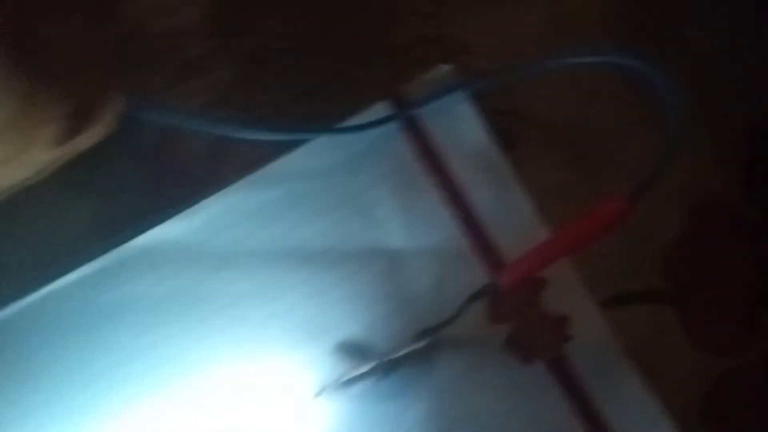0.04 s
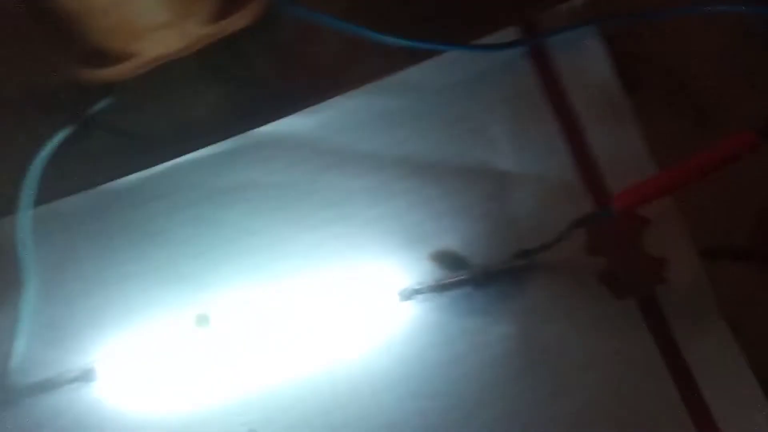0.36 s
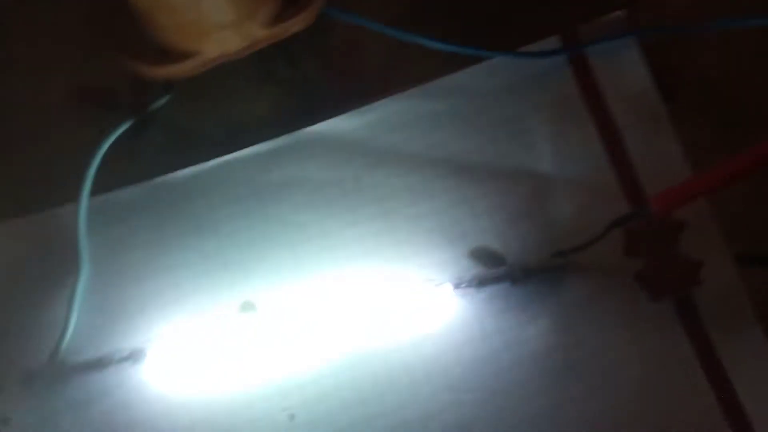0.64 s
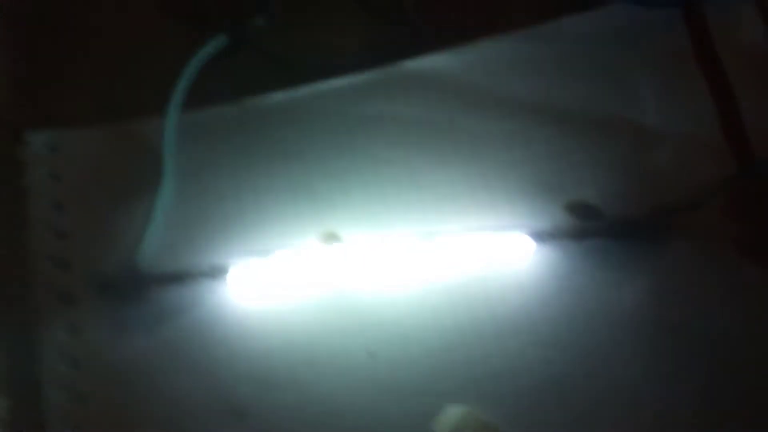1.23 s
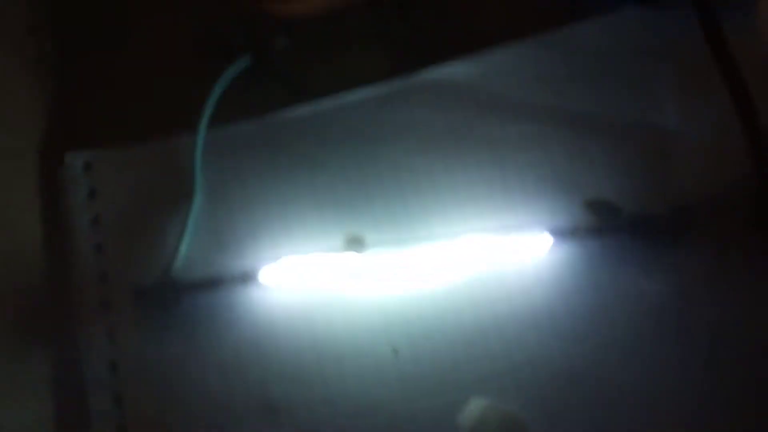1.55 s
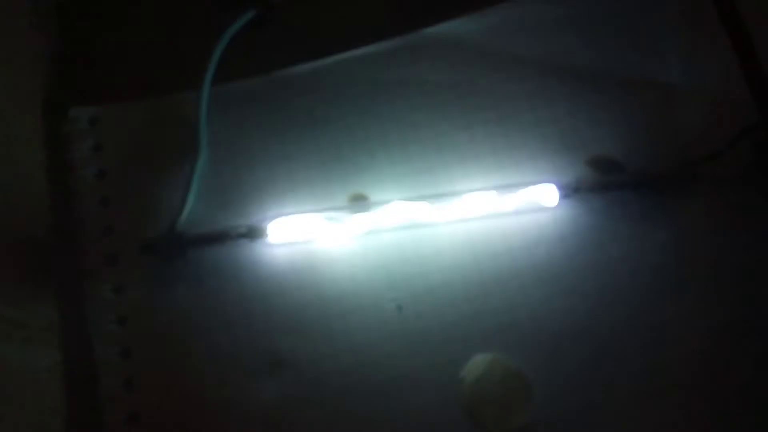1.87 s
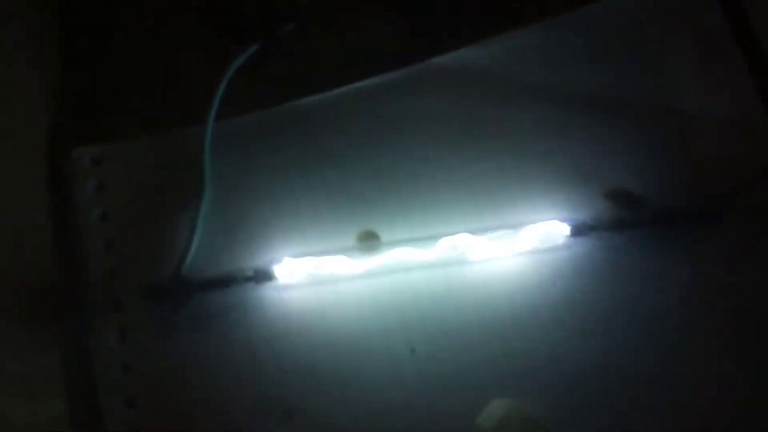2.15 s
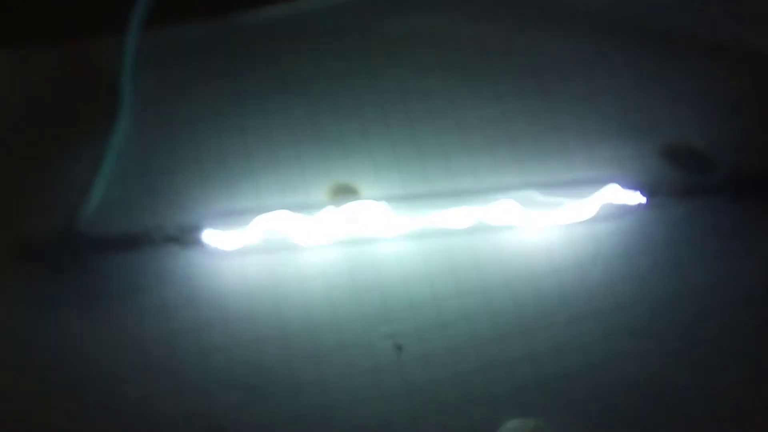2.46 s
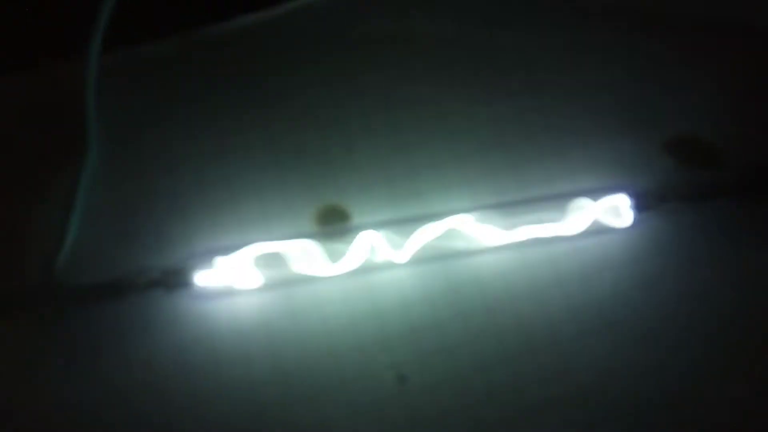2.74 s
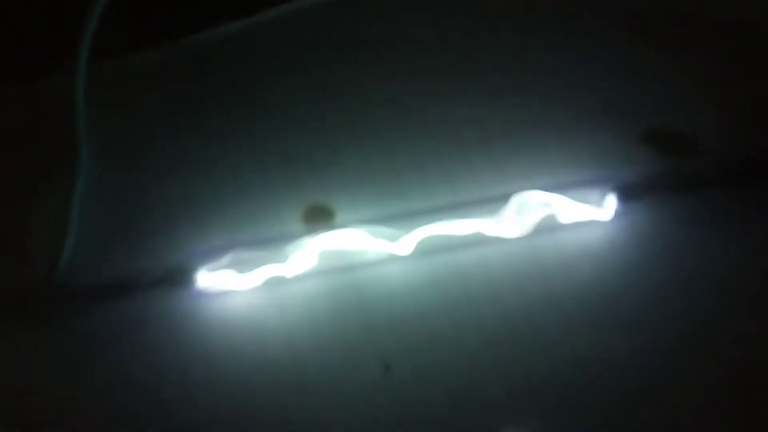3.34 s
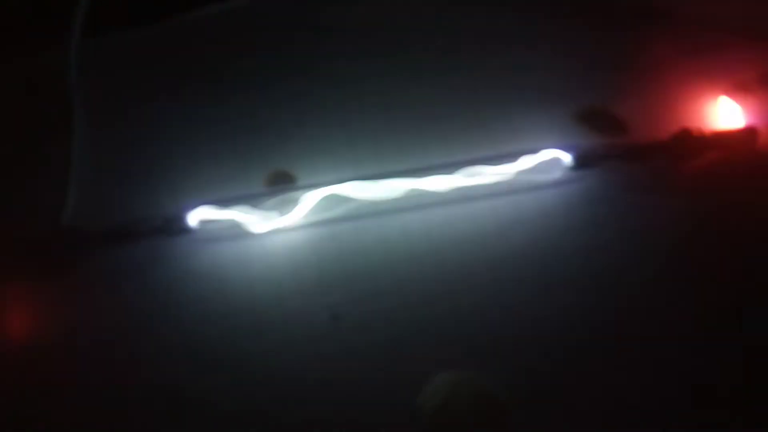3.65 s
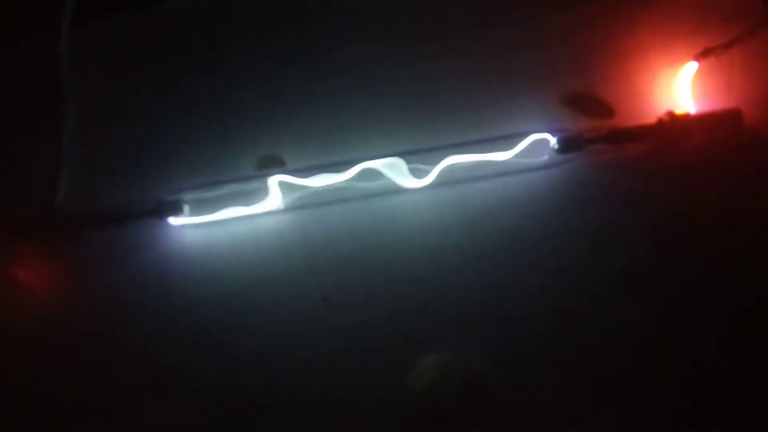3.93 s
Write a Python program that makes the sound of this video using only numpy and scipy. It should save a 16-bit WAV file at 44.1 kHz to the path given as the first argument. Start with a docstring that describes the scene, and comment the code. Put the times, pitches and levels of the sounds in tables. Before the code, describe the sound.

A piercing electrical whine from a high-voltage discharge tube holds over a faint hum and occasional snaps, heard up close in a small room. Finally it climbs, breaks off in crackling sparks and returns as a lower squeal.

```python
"""In a small room, close by, a high-voltage arc writhes in a glass discharge tube.
Its transformer whines near 14.4 kHz over a supply that hums at twice the mains frequency.
Corona sizzles and sparks snap at a lead, each a volley of tiny discharges. Near the end the lead
arcs over in a crackling burst, the hum sags, and the whine climbs, breaks off and comes back
as a lower squeal."""
import sys
import numpy as np
from scipy import signal
from scipy.fft import rfft, irfft, next_fast_len
from scipy.io import wavfile
from scipy.ndimage import map_coordinates

SR = 44100
rng = np.random.default_rng(int(sys.argv[2]) if len(sys.argv) > 2 else 0)


def digitize_waveform(pressure):
    """Quantize a signal to 16-bit integers and store it at the path in sys.argv[1].

    Rows of a 2-D input are taken as channels; values are limited to [-1, 1].
    """
    field = np.atleast_2d(pressure).T
    bounded = np.clip(field, -1, 1)
    quanta = np.round(bounded * 32767).astype(np.int16)
    wavfile.write(sys.argv[1], SR, quanta)


N = 176400

# transformer's switching rate while the tube burns steadily (time [s], pitch [Hz])
WHINE_PITCH = [(0, 14470), (.04, 14330), (.23, 14510), (.36, 14405), (.51, 14500), (.69, 14455),
               (.9, 14420), (1.24, 14500), (1.36, 14430), (1.94, 14430), (2.04, 14500), (2.13, 14395),
               (2.29, 14480), (2.43, 14450), (2.46, 14400), (2.62, 14390), (2.67, 14465), (2.77, 14490),
               (2.85, 14400), (2.96, 14470), (3.35, 14395), (3.41, 14545), (3.44, 14390), (3.54, 14420)]
# fader ride of that whine (time [s], level [dB])
WHINE_LEVEL = [(0, -53), (.022, -57.5), (.035, -44), (0.221, -50.5), (.255, -59), (.33, -48), (0.789, -49),
               (0.841, -69), (.96, -52.5), (.99, -61), (1.331, -62.5), (1.7, -59), (2.3, -58.5),
               (2.35, -54), (2.41, -49.5), (2.52, -64.5), (2.6, -65.5), (2.65, -53.5), (2.77, -51.5),
               (3.05, -55.5), (3.38, -55), (3.441, -47), (3.51, -53), (3.54, -51)]
# the whine climbs as the lead starts to arc (time [s], pitch [Hz], level [dB])
WHINE_CLIMB = [(3.54, 14270, -60), (3.556, 14640, -39.5), (3.558, 15560, -39), (3.574, 15160, -45),
               (3.581, 14540, -40.5), (3.589, 14410, -32.5), (3.592, 15400, -39), (3.612, 15340, -34),
               (3.618, 15450, -44), (3.627, 15650, -28), (3.634, 15730, -59), (3.66, 15500, -58),
               (3.69, 15900, -70)]
# it comes back as a lower squeal (time [s], pitch [Hz], level [dB])
SQUEAL = [(3.769, 9860, -37), (3.787, 9940, -31.5), (3.8, 10150, -26.5), (3.823, 10340, -32),
          (3.84, 10050, -28), (3.852, 9960, -32), (3.902, 9800, -38.5), (3.909, 10070, -27),
          (3.917, 9850, -35.5), (3.945, 10010, -31.5), (3.97, 9750, -39), (4, 9840, -42.5)]
# faint falling squeak under the squeal (time [s], pitch [Hz], level [dB])
SQUEAK = [(3.79, 2650, -100), (3.813, 2500, -82), (3.848, 2230, -89), (3.894, 1830, -92), (3.91, 1750, -96)]
# rough edge around each of these tones (offset from pitch [Hz], gain [dB])
EDGE_EQ = [(20, 0), (90, -3), (200, -17), (400, -31), (800, -43), (1400, -62), (4000, -85)]

# sparks as the lead arcs over (time [s], length [s], level [dB], ring [Hz], ring over crackle [dB])
ARC_SPARKS = [(3.5754, 0.0046, -32, 6670, 5), (3.5803, 0.0083, -27.5, 7060, 13),
              (3.59, 0.015, -46, 7920, 18), (3.629, 0.0027, -51.5, 7940, 18),
              (3.636, 0.0019, -53, 5200, -26), (3.707, 0.0049, -52, 4600, -11),
              (3.7125, 0.0046, -46.5, 6500, -2), (3.7185, 0.0089, -55, 6500, 5),
              (3.731, 0.015, -57, 6500, -13), (3.746, 0.0018, -48, 5140, -26),
              (3.7505, 0.027, -49.5, 6800, -13), (3.763, 0.0055, -39.5, 6700, -8),
              (3.769, 0.0022, -42, 4850, 12), (3.823, 0.0013, -54, 6700, -1),
              (3.839, 0.0013, -35.5, 5200, -53), (3.859, 0.0014, -50.5, 6800, 2),
              (3.913, 0.0037, -40, 6900, 1), (3.919, 0.0066, -34.5, 8780, -1),
              (3.931, 0.0018, -40.5, 6750, 10), (3.951, 0.0017, -44.5, 6840, -11),
              (3.969, 0.0087, -42, 4980, 7.5), (3.981, 0.004, -35, 6470, -8), (3.989, .012, -46, 4700, -2)]
# colour of their crackle (frequency [Hz], gain [dB])
ARC_EQ = [(200, -35), (1400, -37), (1900, -17), (2350, -14), (2700, -23.5), (3150, -26), (3500, -15.5),
          (3950, -17.5), (4900, 4), (5750, -3), (6700, -2.5), (8200, -6), (8900, 4), (10600, -1.5),
          (12300, -9), (14000, -7), (15800, -13)]
# ringing snaps at the tube (time [s], length [s], level [dB], ring [Hz], ring over crackle [dB])
TUBE_SNAPS = [(.0525, 0.0028, -44, 5100, -12), (.068, 0.0067, -45.5, 5900, -11),
              (.120, 0.0028, -42, 5150, -5.5), (3.4705, 0.0021, -43, 6080, -0.5),
              (3.5445, 0.011, -46.5, 6400, -4), (3.557, 0.0041, -43, 5750, -5.5)]
# colour of the snaps (frequency [Hz], gain [dB])
SNAP_EQ = [(200, -36.5), (2700, -38.5), (3150, -34.5), (3520, -17), (3950, -26.5), (4600, -3), (4850, -4),
           (5250, 2.5), (5650, -7), (6050, -2.5), (6600, -7.5), (8000, -1), (9000, -8.5), (10600, -37),
           (13900, -7), (15000, -18), (16000, -38.5)]
# corona sizzles (time [s], length [s], level [dB])
SIZZLES = [(0.021, 0.046, -65.5), (0.072, 0.026, -65), (0.123, 0.022, -68), (0.227, 0.0058, -76.5),
           (.53, 0.039, -61), (0.65, 0.024, -64), (1.473, 0.019, -73.5), (1.83, 0.0092, -67.5),
           (2.063, .005, -82), (2.446, 0.014, -71), (2.63, 0.0051, -91), (3.407, .004, -71.5),
           (3.424, 0.057, -66), (3.495, .028, -72), (3.521, 0.023, -59.5), (3.617, 0.064, -70.5)]
# their thin, bright colour (frequency [Hz], gain [dB])
SIZZLE_EQ = [(3000, -50), (4800, -30.5), (5300, -9.5), (5700, -26.5), (6050, -10), (6600, -26), (7800, 3.5),
             (8350, 0), (9200, -13), (10700, -27.5), (11450, -5), (12200, -37), (14000, -2.5), (14900, -8),
             (15400, -22.5), (16000, -35.5)]

# partials of the supply hum (harmonic [number], level at 0 dB load [dB], load tracking [dB/dB])
HUM_PARTIALS = [(1, -93, -0.42), (2, -79, -0.035), (3, -90, -0.17), (4, -63, 0.94), (5, -77.5, 0.65),
                (6, -98, -0.34), (7, -99, 0.17), (8, -101, 0), (9, -102, 0.28), (10, -99, -0.22),
                (11, -99, .2), (12, -97, .2), (13, -106, 0), (14, -103, -0.27), (15, -103, 0.74)]
# load on the supply (time [s], load [dB])
SUPPLY_LOAD = [(0, -5.5), (.8, -2.5), (1.6, -2), (2.2, -1.5), (2.55, 2), (2.95, 1), (3.4, 1.5), (3.585, 1),
               (3.63, -16.5), (3.81, -15.5), (3.842, -0.5), (3.88, -17.5), (4, -17)]
# unsteady low drone around the hum (time [s], level [dB])
DRONE_LEVEL = [(0, -94), (1.35, -85.5), (1.55, -82.5), (2.25, -85), (2.5, -78), (2.75, -86.5), (3.0, -84),
               (3.4, -77), (3.5, -81.5), (4, -97)]
# colour of the drone (frequency [Hz], gain [dB])
DRONE_EQ = [(200, -37.5), (270, -15), (325, -7), (370, -6.5), (450, -4), (520, -20.5), (650, -48)]
# swells of a low ring beside the hum (peak time [s], half length [s], pitch [Hz], level [dB])
LOW_SWELLS = [(1.532, .05, 326.5, -81.5), (2.557, 0.14, 368, -78), (3.424, 0.052, 323.6, -71.5)]

# colour of the dry tick (frequency [Hz], gain [dB])
TICK_EQ = [(30, 6), (450, 17), (900, 1), (3000, -7), (8000, -6), (14500, 9), (16000, -13)]
# soft chirps (peak time [s], half length [s], centre [Hz], width [Hz], level [dB])
CHIRPS = [(0.06, 0.08, 1750, 250, -87.5), (0.956, 0.026, 1700, 400, -88), (0.966, 0.037, 5700, 1300, -86.5),
          (1.21, .03, 1772, 304, -87.5), (1.299, 0.023, 6430, 130, -76), (1.827, 0.046, 5900, 500, -83),
          (1.864, 0.03, 5440, 198, -76), (1.962, 0.03, 2240, 248, -87), (2.026, .015, 4990, 100, -91),
          (2.334, .015, 6750, 200, -89.5), (3.471, 0.0099, 2095, 150, -76), (3.0, 0.061, 1750, 508, -90.5),
          (3.022, 0.017, 6400, 595, -87.5), (3.188, 0.031, 1730, 150, -89.5)]
# low rumble under the flashover (frequency [Hz], gain [dB])
RUMBLE_EQ = [(10, -4), (40, 0), (100, -5.5), (300, -11), (1000, -13), (3000, -13.5)]
# room tone (frequency [Hz], gain [dB])
ROOM_TONE_EQ = [(25, -7), (70, -7), (160, 4), (260, -2.5), (420, 1), (650, -9), (1200, -11), (1900, -9.5),
                (3000, -12.5), (6300, -11.5), (7500, -16.5), (11000, -18), (13000, -21.5), (16000, -28)]

HUM_HZ, RING_WIDTH_HZ, TOP_HZ = 100.0, 650, 15950
TICK_S, TICK_GAIN_DB = 2.4218, -46
FLASHOVER_S, RUMBLE_DB, ROOM_TONE_DB = 3.6, -77, -87
ROOM_T60_S, CRACKLE_SEND_DB, WHINE_SEND_DB = .12, -13.5, -14.5


def transformer():
    """A high whine holds, climbs and returns as a squeal, with a faint falling squeak beneath."""
    steady = whine(WHINE_PITCH, WHINE_LEVEL, flutter_db=1.1, wander_hz=7, edge_db=-14)
    climb = whine(WHINE_CLIMB, WHINE_CLIMB, flutter_db=1.2, wander_hz=35.3, edge_db=-13)
    squeal = whine(SQUEAL, SQUEAL, flutter_db=.5, wander_hz=9, edge_db=-23)
    squeak = whine(SQUEAK, SQUEAK, flutter_db=2.5, wander_hz=20, edge_db=-10)
    return steady + climb + squeal + squeak


def whine(pitch, level, flutter_db, wander_hz, edge_db):
    """One rough-edged tone that wavers with the arc; its level flutters most when it is weak."""
    hz, db = curves(pitch)[0], curves(level)[-1]
    t = clock()
    start, end = level[0][0], level[-1][0]
    gate = np.clip(np.minimum(t - start, end - t) / .004 + 1, 0, 1)  # 4 ms fades
    phase = 2 * np.pi * np.cumsum(hz + wander_hz * wobble(rate=120)) / SR
    edge = noise(EDGE_EQ) * np.sin(phase) + noise(EDGE_EQ) * np.cos(phase)
    tone = np.sqrt(2) * np.sin(phase) + amp(edge_db) * edge
    strong_db = np.percentile([row[-1] for row in level], 80)
    depth_db = flutter_db * (1 + np.maximum(strong_db - db, 0) / 6.5)  # twice as deep 6.5 dB down
    flutter = 2 * np.tanh(wobble(rate=70) / 2)
    return gate * amp(db + depth_db * flutter) * tone


def sparks(cues, eq):
    """Each spark is a volley of discharges: a broad crackle with a brief ring."""
    out = np.zeros(N)
    for start, length, db, ring_hz, ring_db in cues:
        volley = discharges(length, release_s=0.0013, per_second=2600, spread_db=3.5)
        volley[0] = 1  # the breakdown that starts it
        crackle = unit_burst(coloured(volley, eq), length)
        ring = unit_burst(resonate(crackle, ring_hz, RING_WIDTH_HZ), length)
        add(out, start, amp(db) * unit_burst(crackle + amp(ring_db) * ring, length))
    return out


def corona():
    """Corona at the lead: denser, more even discharges blur into short, fine sizzles."""
    out = np.zeros(N)
    for start, length, db in SIZZLES:
        volley = discharges(length, release_s=0.0024, per_second=3600, spread_db=2.5)
        add(out, start, amp(db) * unit_burst(coloured(volley, SIZZLE_EQ), length))
    return out


def discharges(length, release_s, per_second, spread_db):
    """A volley of tiny discharges of uneven size, held for its length and then dying away."""
    t = np.arange(SR // 8) / SR
    fired = rng.random(len(t)) < per_second / SR
    sizes = amp(spread_db * rng.standard_normal(len(t))) * rng.choice([-1, 1], len(t))
    return fired * sizes * np.exp(-np.maximum(t - length, 0) / release_s)


def supply_hum():
    """Mains harmonics that ride the load, with an unsteady drone around them."""
    load_db, = curves(SUPPLY_LOAD)
    drone_db, = curves(DRONE_LEVEL)
    hum = np.zeros(N)
    for harmonic, db, tracking in HUM_PARTIALS:
        gain = amp(db + tracking * load_db + 0.67 * wobble(rate=7))
        hum += gain * np.sin(2 * np.pi * (harmonic * HUM_HZ * clock() + rng.random()))
    return hum + amp(drone_db) * noise(DRONE_EQ)


def low_swells():
    """A low ring that swells briefly and beats against the hum."""
    out = np.zeros(N)
    for peak, half_length, hz, db in LOW_SWELLS:
        ring = np.sqrt(2) * np.sin(2 * np.pi * (hz * clock() + rng.random()))
        out += amp(db) * swell(peak, half_length) * ring
    return out


def tick():
    """One faint, dry tick: a filtered impulse."""
    out = np.zeros(N)
    add(out, TICK_S, amp(TICK_GAIN_DB) * coloured(signal.unit_impulse(SR // 20), TICK_EQ))
    return out


def chirps():
    """Faint swells of narrow-band noise."""
    out = np.zeros(N)
    for peak, half_length, hz, width_hz, db in CHIRPS:
        band = unit(resonate(rng.standard_normal(N), hz, width_hz))
        out += amp(db) * swell(peak, half_length) * band
    return out


def room_reverb(send):
    """The table and walls answer with a short, diffuse tail."""
    t = np.arange(SR // 3) / SR
    build_up = 1 - np.exp(-t / .003)
    tail = rng.standard_normal(len(t)) * amp(-60 * t / ROOM_T60_S) * build_up
    return signal.fftconvolve(send, tail / np.linalg.norm(tail))[:N]


def background():
    """A bed of room tone, and a rumble that fades in with the flashover."""
    fade_in = np.clip((clock() - FLASHOVER_S) / 0.11 + 1, 0, 1)
    return amp(ROOM_TONE_DB) * noise(ROOM_TONE_EQ) + amp(RUMBLE_DB) * fade_in * noise(RUMBLE_EQ)


def amp(db):
    """Decibels to linear gain."""
    return 10 ** (np.asarray(db) / 20)


def unit(x):
    """Scale to rms 1."""
    return x / np.sqrt(np.mean(x ** 2) + 1e-20)


def unit_burst(x, length):
    """Give a burst the energy of rms 1 held for length seconds."""
    return x * np.sqrt(length * SR / (np.sum(x ** 2) + 1e-20))


def clock():
    """Time of every sample in seconds."""
    return np.arange(N) / SR


def curves(rows):
    """One automation curve for each column after the time."""
    times, *columns = np.transpose(rows)
    return [np.interp(clock(), times, column) for column in columns]


def swell(peak, half_length):
    """A bell-shaped envelope around the peak time."""
    return np.exp(-((clock() - peak) / half_length) ** 2)


def wobble(rate):
    """Smooth random modulation through rate points a second."""
    return map_coordinates(rng.standard_normal(4096), [clock() * rate], mode="wrap")


def coloured(x, eq):
    """Minimum-phase EQ that keeps the power of white noise."""
    size = 2 * next_fast_len(len(x) // 2 + 2048)
    hz, db = np.transpose(eq)
    bins_hz = np.fft.rfftfreq(size, 1 / SR)
    gain = unit(amp(np.interp(np.log(bins_hz + 1), np.log(hz), db)))
    cepstrum = irfft(np.log(gain))
    cepstrum[1:size // 2] *= 2  # folded forward so nothing rings ahead of an attack
    cepstrum[size // 2 + 1:] = 0
    return irfft(rfft(x, size) * np.exp(rfft(cepstrum)), size)[:len(x)]


def noise(eq):
    """Coloured noise of rms 1."""
    return unit(coloured(rng.standard_normal(N), eq))


def resonate(x, hz, width_hz):
    """A resonance with steep skirts: two wider band-passes in series."""
    b, a = signal.iirpeak(hz, hz / (1.5 * width_hz), SR)
    return signal.lfilter(b, a, signal.lfilter(b, a, x))


def add(track, start, x):
    """Mix x into the track at start seconds."""
    part = track[max(round(start * SR), 0):][:len(x)]
    part += x[:len(part)]


def scene():
    """Mono mix: whine and crackle up front with a touch of room, hum and hush underneath."""
    crackle = corona() + sparks(TUBE_SNAPS, SNAP_EQ) + sparks(ARC_SPARKS, ARC_EQ)
    tones = transformer()
    reverb = room_reverb(amp(CRACKLE_SEND_DB) * crackle + amp(WHINE_SEND_DB) * tones)
    bed = supply_hum() + low_swells() + tick() + chirps() + background()
    return (tones + crackle + reverb + bed)[None]


def record(dry):
    """A brick-wall high cut on the whole mix."""
    size = next_fast_len(N + SR // 2)
    passband = np.fft.rfftfreq(size, 1 / SR) < TOP_HZ
    return irfft(rfft(dry, size) * passband, size)[..., :N]


dry = scene()
out = record(dry)
digitize_waveform(out)
```